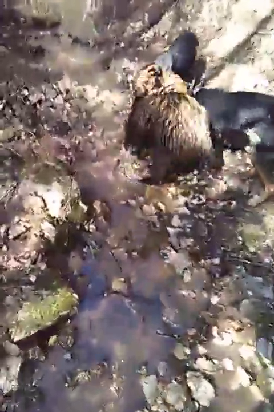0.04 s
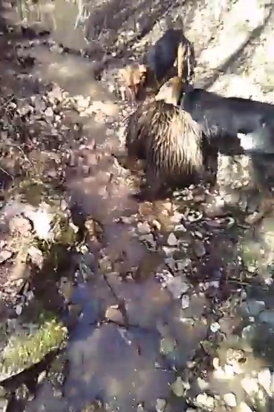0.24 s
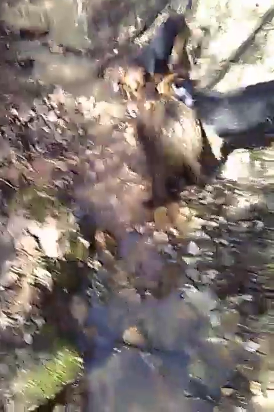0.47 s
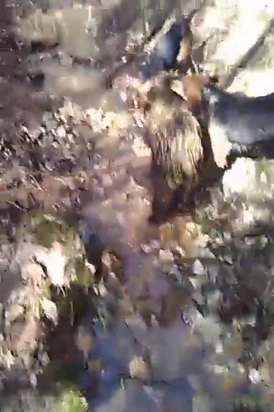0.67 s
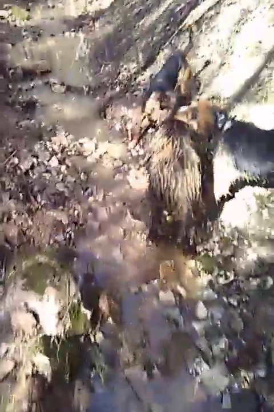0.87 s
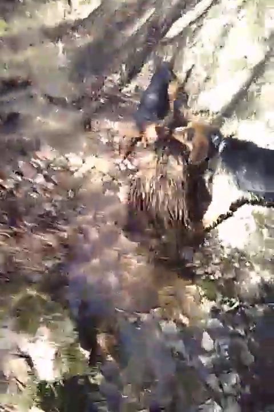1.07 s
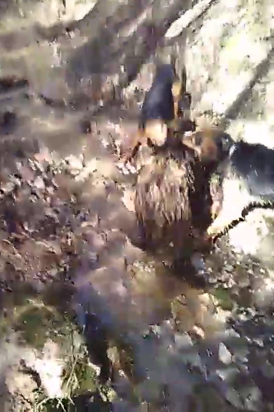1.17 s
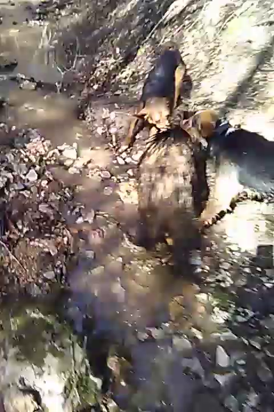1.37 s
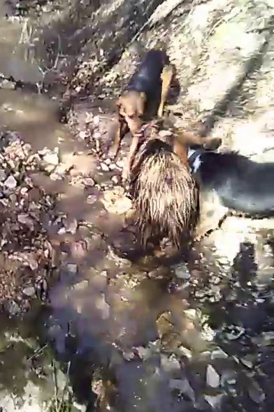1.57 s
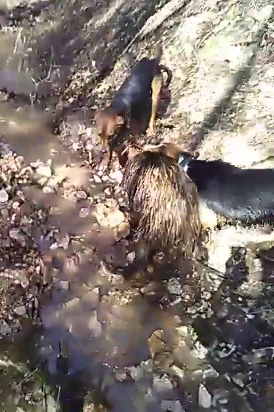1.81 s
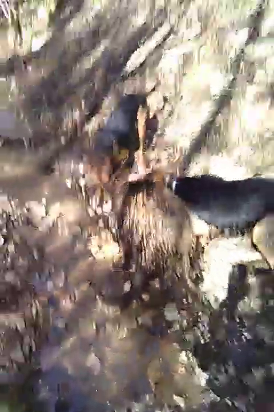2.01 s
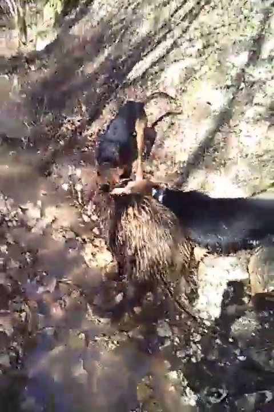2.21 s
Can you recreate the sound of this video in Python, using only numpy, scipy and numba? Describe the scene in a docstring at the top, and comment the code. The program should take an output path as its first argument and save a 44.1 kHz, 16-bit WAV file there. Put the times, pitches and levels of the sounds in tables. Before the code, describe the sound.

A young wild boar squeals, hoarse and shrill, from about 0.1 seconds, running into a second, higher squeal at 0.8 that falls away by 1.7. A dog yelps once around 0.7. Dry leaves crackle underneath, with faint growls. A collar bell clinks near 1.6, twigs snap just after, and an animal huffs softly at 1.9. Nearby rocks add a short echo over light outdoor hiss.

```python
"""A rocky slope, outdoors: a young wild boar, held by dogs, gives two long hoarse squeals, its uneven
vocal folds ringing throat, mouth and snout. One dog yelps across the first. A collar bell clinks,
twigs and dry leaves crack underfoot, an animal huffs, and the near rocks throw back a short echo.
The hand-held microphone has two unlike ports: voices and bell reach the left one dull and out of
phase with the right."""
import sys
import numpy as np
from scipy import signal
from scipy.fft import rfft, irfft
from scipy.io import wavfile
from scipy.ndimage import uniform_filter1d
from numba import njit

SR = 44100
rng = np.random.default_rng(int(sys.argv[2]) if len(sys.argv) > 2 else 0)


def unload_wav(signal):
    """Save mono or channel-first audio to the path in sys.argv[1] as 16-bit WAV at rate SR, clipped to [-1, 1]."""
    wavfile.write(
        sys.argv[1],
        SR,
        np.round(np.clip(np.atleast_2d(signal).T, -1, 1) * 32767).astype(np.int16),
    )


N = 99225
T = np.arange(N) / SR

# spectra of the open air and of handling noise (frequency [Hz], gain [dB])
AIR_COLOUR = [(30,-19),(100,-29),(290,-9.5),(1500,-1),(3560,0.5),(4450,-7.5),(8270,7.5),(14000,-2.5)]
RUMBLE_COLOUR = [(20, -25), (65, -2.5), (130, -15), (400, -26), (2000, -78)]
# hand on the microphone (time [s], level [dB])
RUMBLE_DB = [(0,-50.5),(.04,-64),(.09,-72),(1.3,-79),(1.4,-61.5),(1.55,-76),(1.66,-56.5),(1.75,-70.5),(2.25,-77.5)]
# spectrum of the echo off the rocks (frequency [Hz], gain [dB])
ECHO_COLOUR = [(350, -16), (1400, -7), (4000, 1)]
# left port against right (frequency [Hz], gain [dB])
LEFT_PORT_DB = [(100,3),(400,-5),(800,-1),(1400,-6),(2400,2),(3400,-2.5),(4500,-8),(6000,-12),(8200,-30),(10500,-10),(13000,-1.5)]
# left port against right (frequency [Hz], phase [rad])
LEFT_PORT_PHASE = [(40,2),(110,-1.5),(260,-2),(700,-4.0),(1380,-5),(1900,-3.5),(2760,-6),(4820,-10),(5510,-11),(8180,-12.5),(9820,-13.5),(12000,-16.5)]

# feet scuffling in the leaves (time [s], level [dB])
SCUFFLE_DB = [(0,-45.5),(.15,-51),(1.6,-39.5),(1.71,-53.5),(1.8,-56),(1.87,-65.5),(1.945,-67),(2.02,-61),(2.12,-60),(2.25,-65)]
# twigs (time [s], level [dB], left minus right [dB], decay [s], knock against crack [dB])
TWIG_SNAPS = [(0.066,-44,-21,0.0022,-32),(.126,-43,-21,0.0051,-18),(.376,-28,-15,.008,-32),(.389,-42,-3,.006,-25),(1.690,-21.5,-2,.0016,-12.5),(1.784,-24,-11.5,0.0014,-38),(1.941,-40.5,-10,0.0024,-20)]
# spectra of dry leaves, a twig's crack, its woody knock and a huff (frequency [Hz], gain [dB])
CRACKLE_COLOUR = [(400,-16),(1500,4.5),(4000,0.5),(6500,-13.5),(8300,5.5),(10500,-9),(14000,-54)]
CRACK_COLOUR = [(300,-59),(1200,-42),(2500,-26),(5000,-18),(8000,8.5),(11000,-1),(15000,-16)]
WOOD_COLOUR = [(100,-47),(400,-8),(1000,-4),(2200,-11),(5000,-32)]
BREATH_COLOUR = [(150,-24),(400,-5),(800,-6),(1200,-2.5),(1600,-8),(2300,-4),(3200,-19.5),(5000,-20)]
# an animal's huff (time [s], level [dB])
HUFF_DB = [(1.88,-73),(1.92,-47.5),(1.97,-47.5),(2.04,-54),(2.25,-69.5)]
# collar bell modes (frequency [Hz], gain [dB], time to fall 60 dB [s])
BELL_MODES = [(2387,0,0.24),(3577,-16.5,0.12),(5630,2.5,0.079),(6223,5.5,0.081),(10300,1.5,0.077),(12350,-1,.06)]
# clapper strokes (time [s], level [dB], brightness [dB/octave], free ringing [s])
BELL_STROKES = [(0.066,-35,-16,0.018),(.124,-38.5,-11.5,.02),(1.611,-29,-5.5,0.024),(1.626,-31,-6.5,0.042),(1.748,-42.5,1.5,0.026),(1.757,-42,0,0.046),(2.198,-41.5,-13.5,.014),(2.232,-37,-13,.04)]

# voices radiate little bass (frequency [Hz], gain [dB])
VOICE_LOW_CUT = [(100,-52),(200,-18),(330,-13.5),(500,-3.5)]
# turbulence at the vocal folds (frequency [Hz], gain [dB])
PUFF_COLOUR = [(300, 14.0), (1500, -2.5), (4000, 6)]
# faint growls under the squeals (time [s], length [s], pitch [Hz], level [dB])
GROWL_EVENTS = [(0.067,0.19,215,-43.5),(0.374,0.096,205,-41),(0.987,0.094,190,-43.5)]
# the dog's yelp (time [s], pitch [Hz], relative voice level [dB], pure fundamental level [dB])
DOG_YELP = [(.58,319,-61,-67),(.61,352.6,-31.5,-30),(.635,422,-35.5,-31),(.657,509.6,-22,-50),(.67,562.4,-26,-30.5),(.695,601,-21.5,-31.5),(.715,564,-24.5,-36),(.728,477.4,-20,-38),(.742,384.3,-23.5,-28.5),(.757,338,-25.5,-35),(.773,304.8,-30,-42),(.787,304.7,-50,-43.5),(.82,317.6,-58,-45.5),(.865,310,-42.5,-50.5),(.92,266,-47,-56)]
# resonance of the dog's mouth as it opens and closes (time [s], frequency [Hz])
DOG_JAW_HZ = [(.58,880),(.63,1010),(.655,1560),(.69,1474),(.715,1427),(.728,1194),(.742,1050),(.765,969),(.92,885)]
# hoarseness of each animal (time [s], roughness [0-1])
DOG_ROUGH = [(.6,.5),(.66,.38),(.70,.3),(.72,.5),(.745,.22),(.86,.08),(.92,.2)]
BOAR_ROUGH = [(.12,.8),(.22,.55),(.28,.36),(.32,.14),(.36,.12),(.395,.85),(.44,.5),(.48,.2),(.51,.08),(.565,.07),(.61,.3),(.8,.55),(.9,.7),(.96,.32),(1.03,.34),(1.1,.65),(1.3,.75),(1.36,.45),(1.405,.16),(1.46,.65),(1.55,.45),(1.65,.6)]

# the boar's two squeals (time [s], pitch [Hz])
FIRST_SQUEAL = [(.1,185.1),(.15,201.2),(.2,252),(.24,274.4),(.285,241.2),(.312,263),(.36,276.3),(.39,255.9),(.426,243),(.45,249.5),(.472,270.2),(.494,283),(.58,290.9),(.62,311.2),(.76,320.5),(.84,308.1)]
SECOND_SQUEAL = [(.82,395.4),(.885,431.4),(.955,383.9),(1.0,404.6),(1.06,424.8),(1.13,443.2),(1.3,458.3),(1.35,442.7),(1.39,398.3),(1.425,395),(1.45,360.1),(1.49,337.1),(1.53,311.2),(1.58,319),(1.62,273.2),(1.68,233)]
# force of the squeals as relative levels, the last three riding on the first
# (time [s], lower mouth [dB], upper mouth [dB], lower snout [dB], upper snout [dB])
SQUEAL_EFFORT = [(0.14, -49, 7, 13, -6), (0.189, -35.5, -5, -10.5, -10), (0.225, -35, 2, -4, -6),
                 (0.281, -32.5, 3, 1.5, -2), (.345, -37, -2, 0.5, 1), (.385, -31.5, -0.5, 0.5, -1.5),
                 (0.435, -34.5, -3.5, 0, -1), (0.5, -34.5, -0.5, -2, -2.5), (0.565, -32.5, -4, 0, -1),
                 (0.797, -35.5, -10, -3, 1), (0.831, -42.5, -5.5, 5.5, -3.5), (0.87, -37.5, 0, 0, -0.5),
                 (1.025, -30.5, -7.5, -5.5, -2.5), (1.097, -43.5, 2, 6.5, 3.5), (1.355, -32.5, -1, -1.5, 0),
                 (1.407, -32.5, 3, -0.5, -3), (1.545, -31.5, -1.5, -2, -5.5),
                 (1.609, -33.5, -7, -1.5, -6.5), (1.68, -55, 3, -15, -9)]
# moving resonances (time [s], lower mouth [Hz], upper mouth [Hz], lower snout [Hz], upper snout [Hz])
TRACT_HZ = [(0.2,2580,3400,5480,8100),(.28,2470,3320,5680,7770),(.345,2460,3400,5700,7840),(0.416,2470,3240,5570,7700),(.54,2590,3500,6160,7800),(0.602,2630,3610,6740,8120),
            (0.744,2884,3370,5570,7460),
            (0.904,2680,3400,5940,7750),(.97,2630,3370,5750,7640),(1.026,2897,3554,5900,7900),(1.12,2460,3290,6700,7980),
            (1.24,2640,3260,5500,7700),(1.334,2900,3450,6000,8080),(1.405,2970,3540,5800,8070),
            (1.476,2780,3580,5770,8100),(1.62,2740,3480,6430,8320)]
# side resonances of the lower and upper snout (frequency [ratio], width [Hz], gain [dB])
LOWER_SIDES = [(0.806,770,-4.5)]
UPPER_SIDES = [(1.188,1320,-4),(1.45,1890,-14.5)]
# nasal dip in the boar's voice (frequency [Hz], gain [dB])
NASAL_COLOUR = [(1500,12.5),(1950,3),(2300,-5),(3550,-5.5),(4020,-5),(4500,6),(6400,6),(7000,2.5),(7700,3)]
# lowest throat resonance (time [s], frequency [Hz])
THROAT_CENTRE = [(.15,1200),(.3,1210),(.37,1270),(.44,1207),(.58,1487),(.78,1420),(.88,1470),(.96,1515),(1.05,1643),(1.2,1340),(1.33,1430),(1.4,1450),(1.47,1410),(1.57,1321),(1.66,1190)]
# strength of that resonance (time [s], relative level [dB])
THROAT_LEVEL = [(.12,-40),(.2,-40.5),(.27,-50.5),(.35,-48),(.5,-44),(.6,-30.5),(.76,-35),(.83,-46.5),(.9,-37),(1.04,-28),(1.1,-57.5),(1.28,-51.5),(1.35,-39.5),(1.45,-42.5),(1.57,-36.5),(1.62,-55),(1.67,-89)]
# the deep, throaty part and the pure fundamental of the squeals (time [s], level [dB])
CHEST_LEVEL = [(.1,-38),(.2,-40.5),(.28,-37.5),(.35,-46),(.42,-47),(.52,-53),(.6,-41.5),(.8,-44.5),(1.04,-45),(1.15,-71),(1.3,-46.5),(1.41,-44),(1.5,-34.5),(1.6,-34),(1.68,-52)]
MOAN_LEVEL = [(.15,-64),(.4,-69.5),(.55,-62.5),(.85,-48),(.95,-47.5),(1.08,-55.5),(1.3,-48.5),(1.45,-53),(1.65,-59.5)]
# piercing notes where one harmonic meets the throat resonance (time [s], level [dB])
WHISTLE_LEVEL = [(.28,-52),(.31,-29),(.365,-30.5),(.40,-44),(.47,-39.5),(.56,-43),(.65,-27),(.74,-44),(.77,-30),(.80,-48),(.83,-62),(.93,-53),(.96,-22.5),(.995,-34),(1.02,-30),(1.05,-44),(1.08,-59),(1.34,-46),(1.37,-39),(1.39,-21.5),(1.418,-21),(1.44,-41),(1.5,-68)]

JITTER, SHIMMER_DB, RASP = .03, 2.5, 2.0  # pitch spread, pulse spread and turbulence at full roughness
THROAT_WIDTH_HZ, CHEST_HZ, CHEST_WIDTH_HZ = 263, 927, 990
LOWER_MOUTH_WIDTH_HZ, UPPER_MOUTH_WIDTH_HZ, SNOUT_WIDTH_HZ = 595, 424, 1020
ANTI_RATIO, ANTI_WIDTH_HZ = 1.29, 450.0  # an antiresonance rides just above the throat resonance


def amp(db):
    """Decibels to gain."""
    return 10 ** (np.asarray(db) / 20)


def unit(x):
    """Scale to rms 1."""
    return x / np.sqrt(np.mean(x ** 2) + 1e-18)


def steady(x):
    """Hold the rms at 1 over 30 ms stretches."""
    return x / np.sqrt(np.abs(uniform_filter1d(x ** 2, size=1323)) + 1e-12)


def curve(rows, column=1):
    """Join one column of a table by straight lines in time."""
    rows = np.array(rows)
    return np.interp(T, rows[:, 0], rows[:, column])


def during(rows):
    """1 while a table lasts, with short fades."""
    return np.clip((T - rows[0][0]) / 0.055, 0, 1) * np.clip((rows[-1][0] - T) / 0.049, 0, 1)


def per_bin(points):
    """Spread (frequency [Hz], value) points over the frequency bins."""
    hz, value = np.array(points).T
    return np.interp(np.log(np.fft.rfftfreq(2 * N, 1 / SR) + 1), np.log(hz), value)


def colour(x, points, phase=0):
    """Filter by (frequency [Hz], gain [dB]) points, with an optional phase turn."""
    return irfft(rfft(x, 2 * N) * amp(per_bin(points)) * np.exp(1j * phase))[..., :N]


def noise(points, shape=N):
    """Coloured noise at rms 1."""
    return unit(colour(rng.standard_normal(shape), points))


def walk(per_s):
    """Smooth random drift with a spread near 1."""
    hold = int(SR / per_s)
    steps = np.repeat(rng.standard_normal(N // hold + 1), hold)
    return 1.3 * uniform_filter1d(uniform_filter1d(steps, hold), hold)[:N]


@njit
def bandpass(x, hz, width_hz):
    """State-variable band-pass with a moving centre."""
    y, band_state, low_state = np.empty(len(x)), 0., 0.
    for i in range(len(x)):
        g, damping = np.tan(np.pi * hz[i] / SR), width_hz / hz[i]
        band = (band_state + g * (x[i] + 1e-18 - low_state)) / (1 + g * (g + damping))
        band_state = 2 * band - band_state
        low_state += 2 * g * band
        y[i] = damping * band
    return y


def resonate(x, hz, width_hz):
    """A resonance with steep skirts: two band-passes in series."""
    hz = np.clip(hz + np.zeros(N), 20, .45 * SR)
    return bandpass(bandpass(x, hz, float(width_hz)), hz, float(width_hz))


def background():
    """Outdoor hiss and the low rumble of a hand-held microphone."""
    air = noise(AIR_COLOUR, (2, N)) * amp(-50 + 0.58 * walk(8.38))
    return air + noise(RUMBLE_COLOUR, (2, N)) * amp(curve(RUMBLE_DB))


def rocks(x, near_db=1, near_decay_s=0.0059, tail_db=-17, tail_t60_s=0.9):
    """Direct sound, a faint tail, and scatter off near rocks that shifts as animals and hand move."""
    def scatter(decay_s):
        response = rng.standard_normal((2, N)) * (T > .001) * np.exp(-T / decay_s)
        response /= np.sqrt(np.sum(response ** 2, axis=-1, keepdims=True))
        return signal.fftconvolve(x[None], response, axes=-1)[:, :N]
    shares = np.array([walk(10.98) for _ in range(6)])
    shares /= np.sqrt(np.sum(shares ** 2, axis=0))
    near = sum(share * scatter(near_decay_s) for share in shares)
    echo = amp(near_db) * near + amp(tail_db) * scatter(tail_t60_s / np.log(1000))
    return x + colour(echo, ECHO_COLOUR)


def ports(stereo):
    """The microphone's left port is dull and out of phase with the right."""
    left, right = stereo
    return np.array([colour(left, LEFT_PORT_DB, per_bin(LEFT_PORT_PHASE)), right])


def leaves(grains_per_s=2500):
    """Dry leaves crackle underfoot, right of the microphone: dense grains of very unequal size."""
    grains = (rng.random(N) < grains_per_s / SR) * amp(1.3 * np.minimum(rng.exponential(size=N), 5))
    crackle = unit(colour(grains * rng.standard_normal((2, N)), CRACKLE_COLOUR))
    return crackle * amp(curve(SCUFFLE_DB) + np.array([[-3.0], [3.0]]))


def twigs(rustle_db=-19, rustle_s=.014):
    """Twigs snap to the right: a sharp crack and a short rustle; thick ones add a woody knock."""
    out = np.zeros((2, N))
    crack, knock = noise(CRACK_COLOUR, (2, N)), noise(WOOD_COLOUR, (2, N))
    for start, db, pan_db, decay_s, knock_db in TWIG_SNAPS:
        age = np.maximum(T - start, 0)
        envelope = (T > start) * (np.exp(-age / decay_s) + amp(rustle_db) * np.exp(-age / rustle_s))
        gains = amp(db + np.array([[pan_db], [-pan_db]]) / 2)
        out += gains * envelope * (crack + amp(knock_db) * knock)
    return out


def huff():
    """An animal's hoarse breath after the squeals."""
    return noise(BREATH_COLOUR) * amp(curve(HUFF_DB)) * (T > HUFF_DB[0][0])


def bell(fur_damp_s=0.0081):
    """The clapper strikes a small collar bell, which rings until fur damps it."""
    out = np.zeros(N)
    for start, db, bright_db, free_s in BELL_STROKES:
        age = np.maximum(T - start, 0)
        envelope = np.minimum(age / 0.0007, 1) * np.exp(-np.maximum(age - free_s, 0) / fur_damp_s)
        for hz, mode_db, t60 in BELL_MODES:
            gain = amp(db + mode_db + bright_db * np.log2(hz / BELL_MODES[0][0]))
            mode = np.exp(-np.log(1000) * age / t60) * np.sin(2 * np.pi * (hz * age + rng.random()))
            out += gain * mode * envelope
    return out


def folds(pitch, rough, puff_cycles=0.36):
    """Vocal folds: uneven pulses, each followed by a puff of turbulence."""
    hz = curve(pitch)
    cycle = (np.cumsum(hz) / SR).astype(int)
    pitch_chance, size_chance = rng.standard_normal((2000, 2))[cycle % 2000].T
    phase = np.cumsum(hz * (1 + JITTER * rough * pitch_chance)) / SR % 1
    closures = np.flatnonzero(np.diff(phase[:-16]) < 0)
    closures = closures[closures > 16]
    late = (1 - phase[closures]) / (phase[closures + 1] + 1 - phase[closures])
    size = amp(SHIMMER_DB * rough * size_chance)[closures]
    pulses = np.zeros(N)
    for k in range(-7, 9):  # a windowed sinc sets each pulse between samples
        pulses[closures + k] += size * np.sinc(k - late) * np.cos(np.pi * (k - late) / 16) ** 2
    puffs = unit(colour(np.exp(-phase / puff_cycles) * rng.standard_normal(N), PUFF_COLOUR))
    return colour(steady(pulses) + RASP * rough * puffs, VOICE_LOW_CUT)


def harmonic(pitch, order=1):
    """A clean sine on one harmonic of the pitch."""
    return np.sqrt(2) * np.sin(2 * np.pi * order * np.cumsum(curve(pitch)) / SR) * during(pitch)


def growls():
    """Short, low, rough growls through closed jaws."""
    out = np.zeros(N)
    for start, length, hz, db in GROWL_EVENTS:
        source = folds([(start, hz), (start + length, hz)], rough=0.52)
        voice = unit(resonate(source, hz=406, width_hz=280))
        out += amp(db) * voice * np.sin(np.pi * np.clip((T - start) / length, 0, 1))
    return out


def dog():
    """A yelp that arches in pitch as the jaw opens and closes, then trails off in a whine."""
    source = folds(DOG_YELP, curve(DOG_ROUGH))
    jaw = resonate(source, curve(DOG_JAW_HZ), width_hz=655)
    edge = amp(-34) * resonate(source, hz=2500, width_hz=1100)
    voice = steady(jaw + edge) * amp(curve(DOG_YELP, 2) + 5.0) * during(DOG_YELP)
    return voice + harmonic(DOG_YELP) * amp(curve(DOG_YELP, 3))


def boar(wander=0.022):
    """Two squeals through the moving resonances of throat, mouth and snout."""
    rough, throat_hz = curve(BOAR_ROUGH), curve(THROAT_CENTRE)
    handover = np.clip((T - SECOND_SQUEAL[0][0]) / 0.019, 0, 1)
    first = folds(FIRST_SQUEAL, rough) * np.sqrt(1 - handover)
    second = folds(SECOND_SQUEAL, rough) * np.sqrt(handover)
    source = colour(first + second, NASAL_COLOUR)
    source = source - bandpass(source, ANTI_RATIO * throat_hz, ANTI_WIDTH_HZ)

    def ring(hz, width_hz):
        return resonate(source, hz * (1 + wander * walk(25.22)), width_hz)

    def snout(column, sides):
        hz = curve(TRACT_HZ, column)
        centre = ring(hz, SNOUT_WIDTH_HZ)
        flanks = sum(amp(db) * ring(ratio * hz, width_hz) for ratio, width_hz, db in sides)
        return steady(centre + flanks) * amp(curve(SQUEAL_EFFORT, column) + 3.0)

    throat = steady(ring(throat_hz, THROAT_WIDTH_HZ)) * amp(curve(THROAT_LEVEL) + 4.0)
    chest = steady(ring(CHEST_HZ, CHEST_WIDTH_HZ)) * amp(curve(CHEST_LEVEL))
    moan = harmonic(FIRST_SQUEAL) + harmonic(SECOND_SQUEAL)
    moan *= amp(curve(MOAN_LEVEL) + 2 * walk(70.3))
    whistle = harmonic(FIRST_SQUEAL, order=5) + harmonic(SECOND_SQUEAL, order=4)
    whistle *= amp(curve(WHISTLE_LEVEL) + 2 * walk(88.5))
    mouth = steady(ring(curve(TRACT_HZ), LOWER_MOUTH_WIDTH_HZ))
    mouth += steady(ring(curve(TRACT_HZ, 2), UPPER_MOUTH_WIDTH_HZ)) * amp(curve(SQUEAL_EFFORT, 2))
    shrill = (mouth + snout(3, LOWER_SIDES) + snout(4, UPPER_SIDES)) * amp(curve(SQUEAL_EFFORT) + 0.5)
    return (throat + chest + moan + whistle + shrill) * during(SQUEAL_EFFORT)


def scene():
    """Voices and bell reach the microphone with their echo; twigs, leaves and background stay dry."""
    animals = huff() + boar() + dog() + growls() + bell()
    return ports(rocks(animals)) + twigs() + leaves() + background()


def record(dry, top_hz=14200):
    """The recorder cuts the top with a steep low-pass."""
    return signal.sosfilt(signal.ellip(8, .2, 70, top_hz, fs=SR, output="sos"), dry)


dry = scene()
out = record(dry)
unload_wav(out)
```